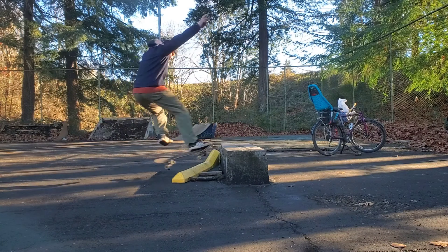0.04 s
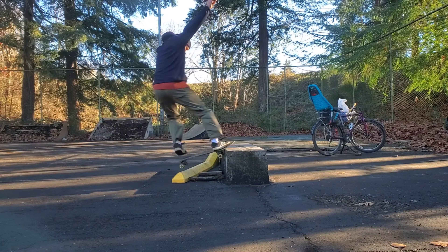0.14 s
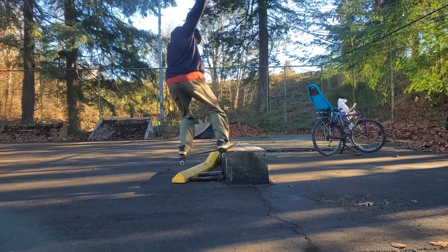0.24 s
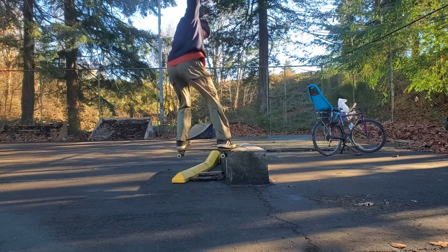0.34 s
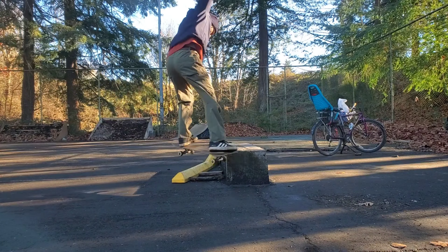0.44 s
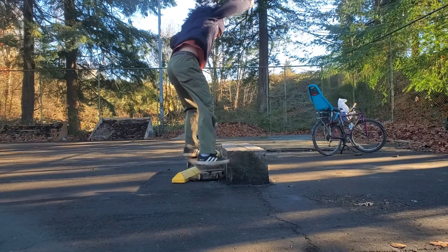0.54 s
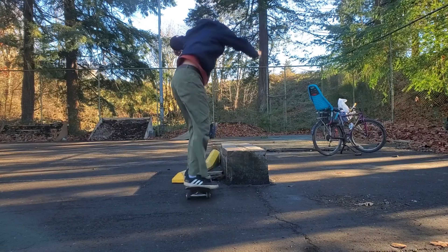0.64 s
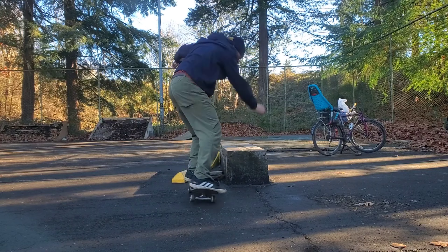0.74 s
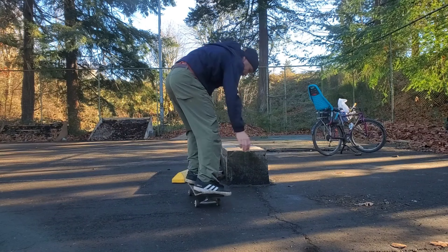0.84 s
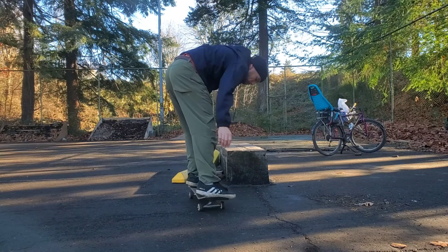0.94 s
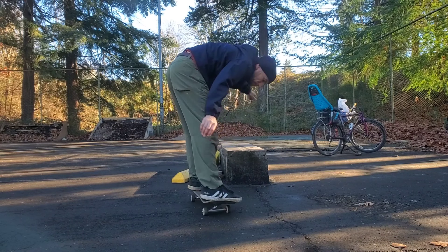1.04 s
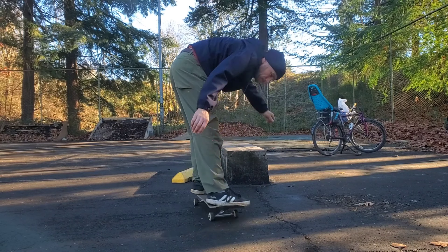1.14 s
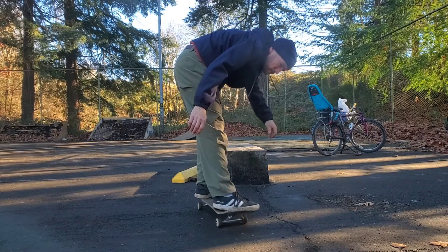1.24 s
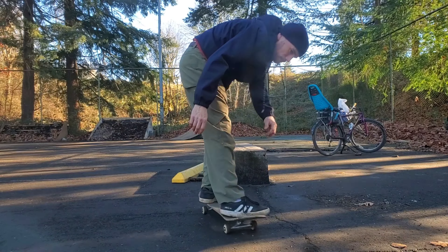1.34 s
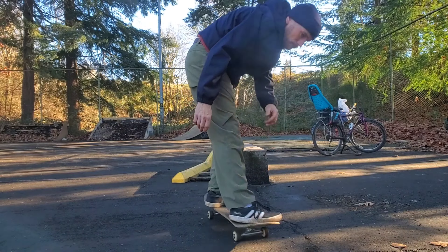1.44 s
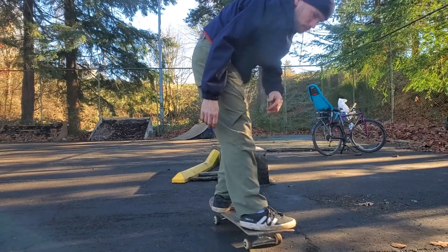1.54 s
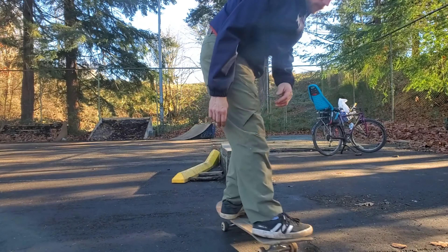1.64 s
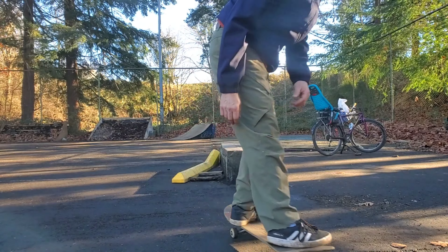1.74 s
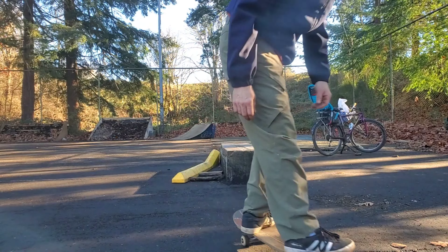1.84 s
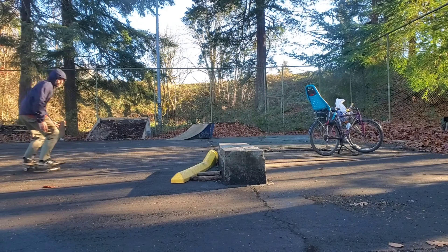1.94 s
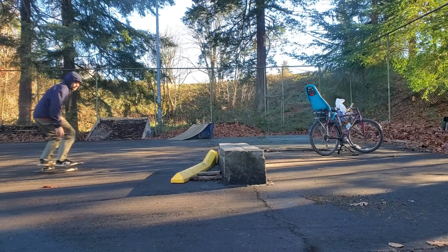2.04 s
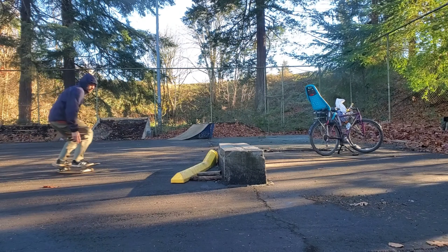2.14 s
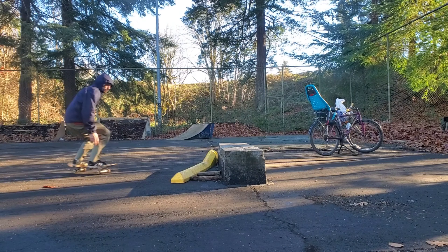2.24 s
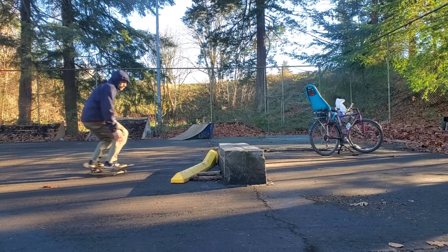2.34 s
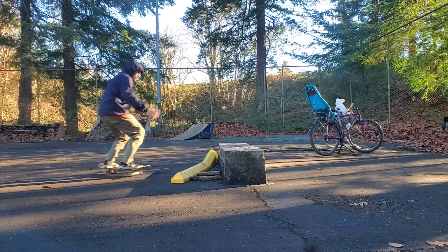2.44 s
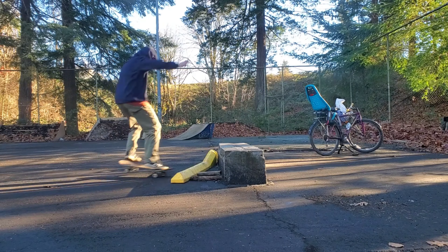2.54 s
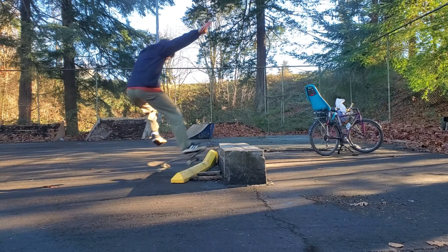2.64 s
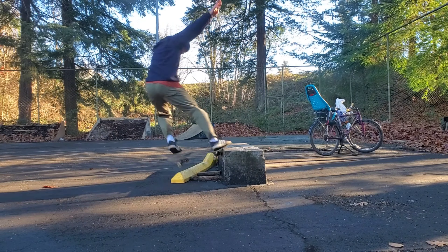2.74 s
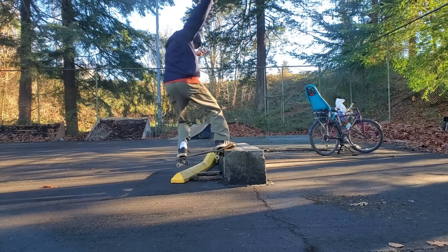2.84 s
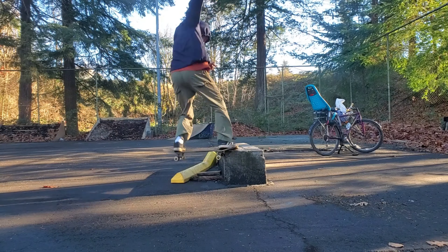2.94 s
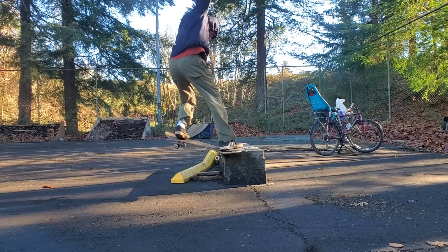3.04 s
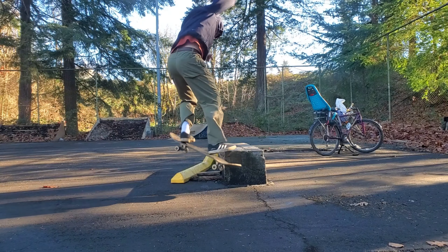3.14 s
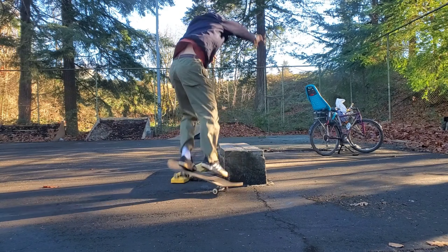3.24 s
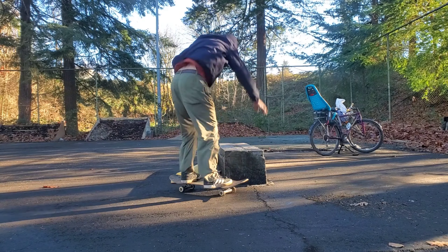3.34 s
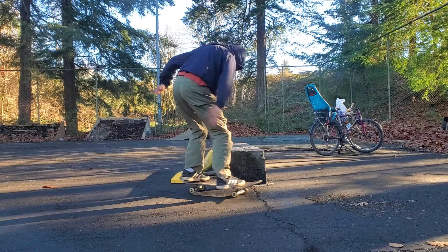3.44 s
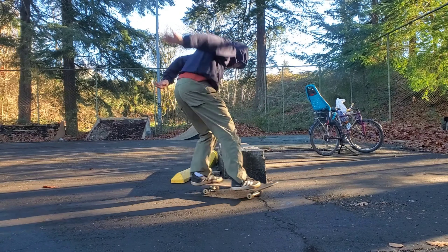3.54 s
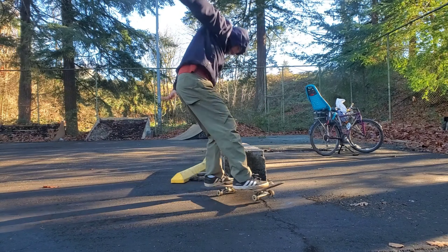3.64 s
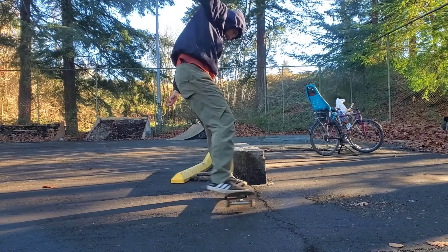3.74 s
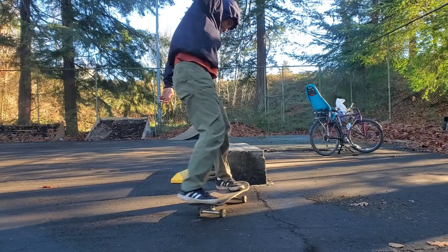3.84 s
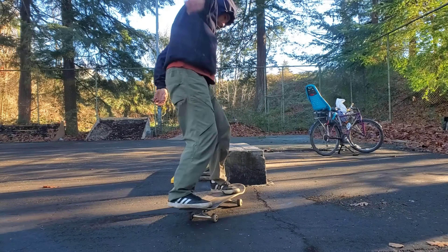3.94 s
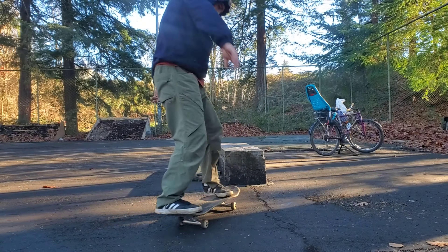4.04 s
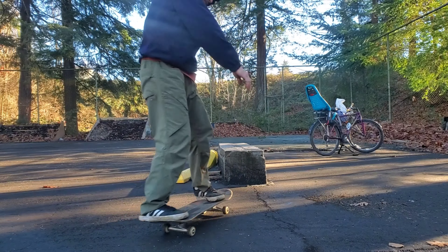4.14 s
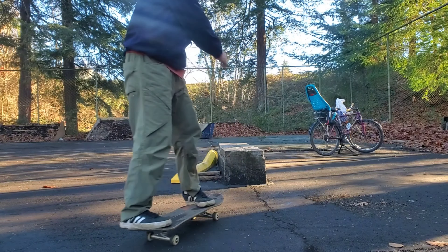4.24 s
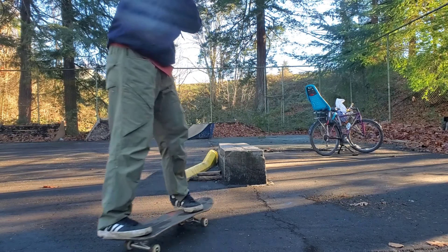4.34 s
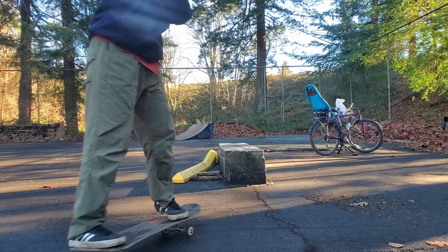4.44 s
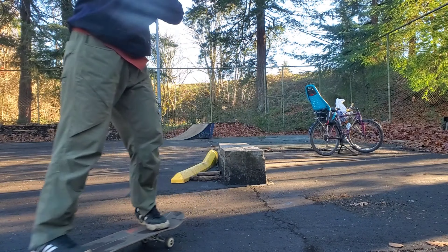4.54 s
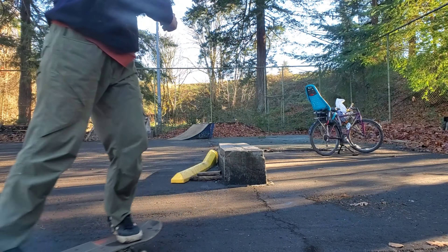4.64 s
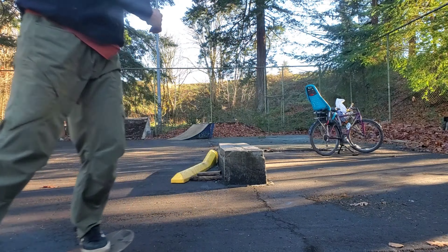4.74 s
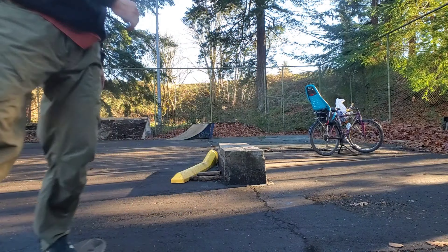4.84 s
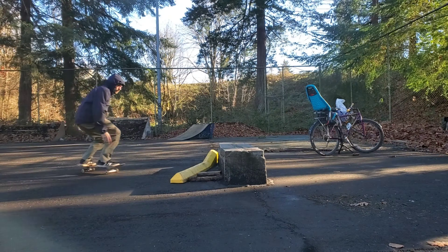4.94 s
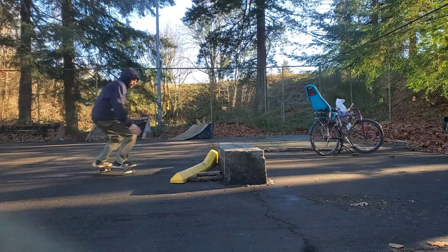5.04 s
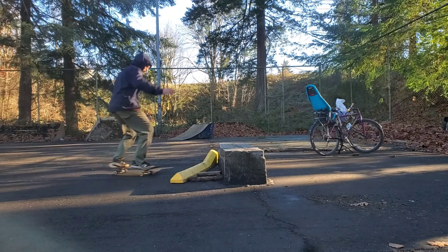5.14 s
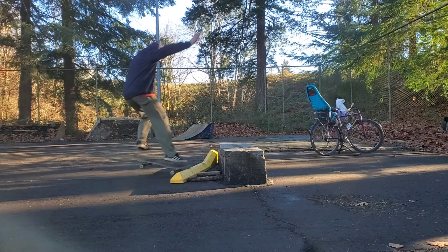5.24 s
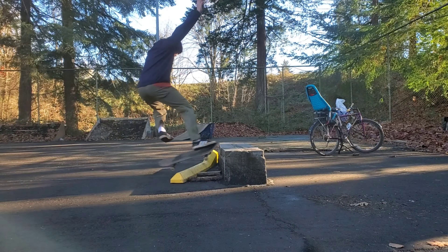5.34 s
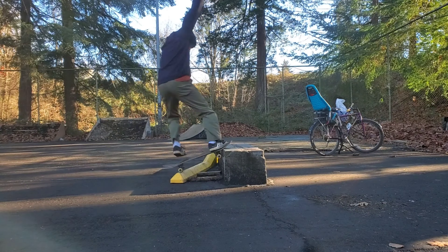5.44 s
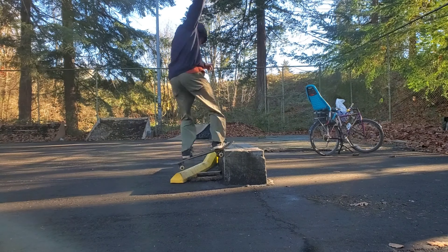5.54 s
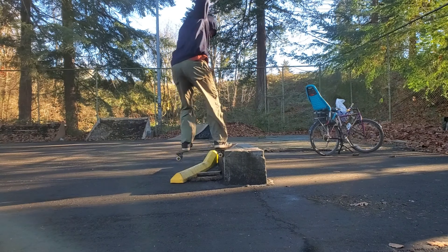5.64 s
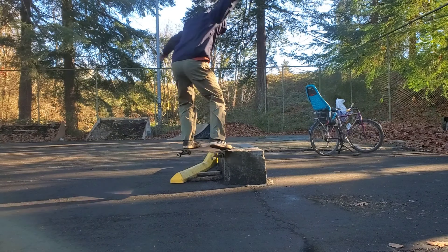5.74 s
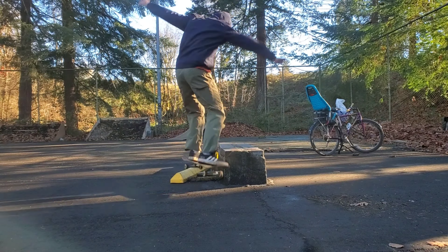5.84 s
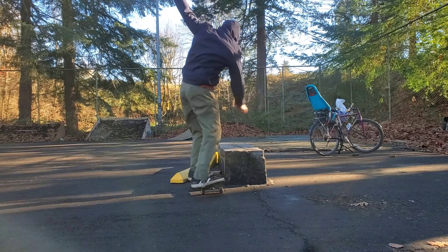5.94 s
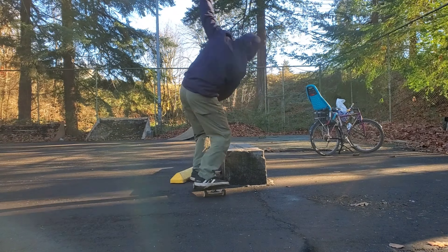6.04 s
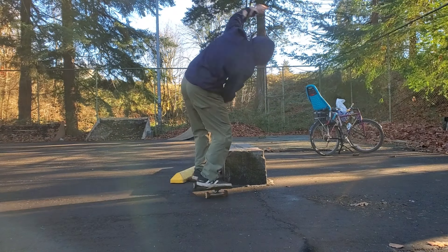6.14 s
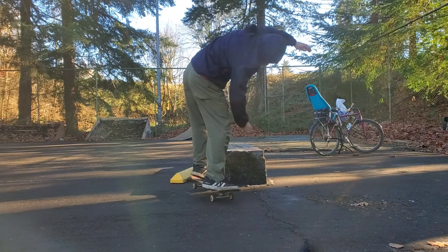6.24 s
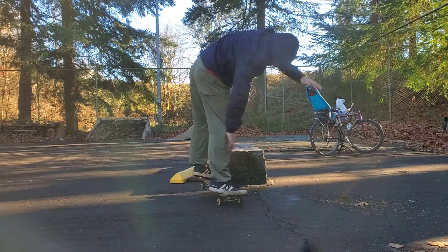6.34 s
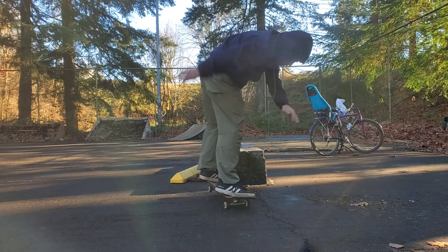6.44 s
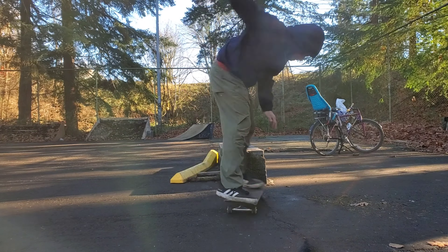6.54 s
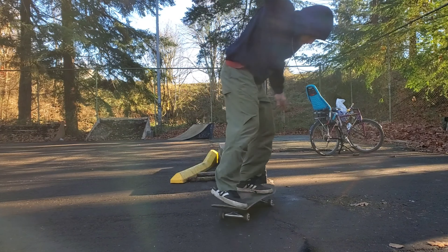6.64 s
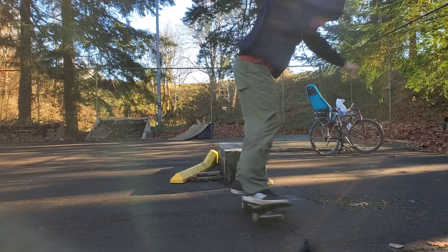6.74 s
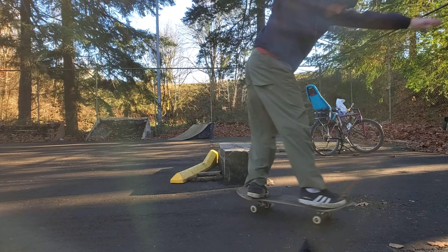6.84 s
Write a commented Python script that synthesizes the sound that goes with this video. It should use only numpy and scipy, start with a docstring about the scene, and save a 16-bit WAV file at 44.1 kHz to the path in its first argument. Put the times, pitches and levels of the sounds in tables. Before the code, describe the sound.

Outdoors on rough asphalt, a skateboard hits a concrete ledge with hard wooden clacks and a short scrape, slaps down and rolls quietly near a small stereo microphone. Abruptly louder rolling starts a second try, with pops, a landing and knocking trucks, then a third. Low wind buffets the microphone; little echo.

```python
"""Skateboard tries at a ledge

A skateboard rolls over rough asphalt among trees, pops, clacks and scrapes on a concrete ledge, lands and
rolls close past a small stereo microphone; three tries follow one another. Random clicks excite coloured
filters (wheels, grit) and parallel resonances (blows, knocks, scrapes, chatter, pings); shaped noise
makes the wind that buffets the microphone ports and the far rustle of trees.
"""
import sys
import numpy as np
from scipy import signal
from scipy.fft import rfft, irfft
from scipy.io import wavfile
from scipy.ndimage import uniform_filter1d

SR = 44100
rng = np.random.default_rng(int(sys.argv[2]) if len(sys.argv) > 2 else 0)


def rack_gain(trim_db):
    """Turn a fader trim in dB into the linear factor to multiply a signal by."""
    fader = np.asarray(trim_db, float)
    return 10 ** (fader / 20)


def store_pcm(level_fs):
    """Save levels as 16-bit WAV."""
    pcm = np.round(np.clip(level_fs, -1, 1) * 32767).astype(np.int16)
    wavfile.write(sys.argv[1], SR, np.atleast_2d(pcm).T)


N = 303408   # length in samples


def rms_one(x):
    """Normalisation to unit effective value."""
    return x / np.sqrt(np.mean(x ** 2) + 1e-20)


def in_time(rows):
    """Linear interpolation of each column over the time in the first."""
    s, *columns = np.transpose(rows)
    return [np.interp(np.arange(N) / SR, s, c) for c in columns]


def at_hz(points, hz):
    """Interpolation along a logarithmic frequency axis."""
    f, value = np.transpose(points)
    return np.interp(np.log(np.maximum(hz, 1)), np.log(f), value)


def band(x, order, hz, kind):
    """Butterworth low-pass or high-pass filtering."""
    return signal.sosfilt(signal.butter(order, hz, kind, fs=SR, output="sos"), x)


def colour(x, spectrum):
    """Minimum-phase filtering by the folded cepstrum: nothing sounds early; white rms 1 stays rms 1."""
    size = 4096
    gain = rack_gain(np.maximum(at_hz(spectrum, np.fft.rfftfreq(size, 1 / SR)), -70))
    cepstrum = irfft(np.log(gain), size)
    cepstrum[1:size // 2] *= 2
    cepstrum[size // 2 + 1:] = 0
    taps = irfft(np.exp(rfft(cepstrum)), size)
    taps = taps / np.sqrt(np.sum(taps ** 2))
    return signal.oaconvolve(np.atleast_2d(x), taps[None], axes=1)[:, :np.shape(x)[-1]]


def drift(rate_hz):
    """Low-passed Gaussian noise as a slow random modulation of rms 1."""
    r = np.exp(-20 * np.pi * rate_hz / SR)   # computed at every tenth sample
    slow = signal.lfilter([1], [1, -2 * r, r * r], rng.standard_normal(N // 10 + 4002))[4000:]
    return np.interp(np.arange(N) / 10, np.arange(len(slow)), rms_one(slow))


def grains(per_s, spread_db, size):
    """Random impulse process: clicks of uneven strength, rms 1 on average."""
    clicks = rack_gain(spread_db * np.minimum(rng.exponential(1, size), 4)) * rng.choice([-1, 1], size)
    happens = rng.random(size) < per_s / SR
    return clicks * happens / np.sqrt(np.mean(clicks ** 2) * per_s / SR)


def pan(db):
    """Interchannel level difference, left over right, limited to 9 dB."""
    return rack_gain(np.clip(db, -9, 9) * np.array([[.5], [-.5]]))


def widen(first, second, alike):
    """Interchannel correlation: two unrelated sounds become left and right of the given likeness."""
    alike = np.clip(alike, -1, 1)
    middle = np.sqrt((1 + alike) / 2) * first
    return middle + np.sqrt((1 - alike) / 2) * second * np.array([[1], [-1]])


def resonate(push, modes, extra_db):
    """Modal superposition: the push drives a set of damped resonances in parallel."""
    out = 0
    for k, (hz, width, db) in enumerate(modes):
        r = np.exp(-np.pi * width / SR)
        poles = [1, -2 * r * np.cos(2 * np.pi * hz / SR), r * r]
        ringing = signal.lfilter([1, 0, -1], poles, push + 1e-18)
        out = out + (-1) ** k * np.sqrt(1 - r * r) * ringing * rack_gain(db + extra_db[k])
    return out


# wheels, one list a try: (t/s, load on the ground as rumble level/dB, roughness as rasp re rumble/dB)
WHEEL_TRIES = [
    [(0.0, -19.5, -4.5), (0.11, -38.5, 6.5), (0.29, -43.5, 8), (0.5, -50, 7.5), (0.58, -51.5, 10.5),
     (0.74, -46.5, 2.5), (0.9, -42.5, 6.5), (1.2, -39, -3.5), (1.57, -40, -4), (1.93, -37, -6.5),
     (1.995, -35.5, -5.5)],
    [(2.003, -29, -5), (2.09, -28.5, 0.5), (2.22, -29.5, -9), (2.57, -28, -10), (2.7, -29.5, -2),
     (2.91, -38, -1), (3.01, -39.5, -3.5), (3.1, -44.5, -8), (3.18, -48, 1), (3.34, -58.5, -4),
     (3.53, -37.5, -3.5), (3.66, -39, -6.5), (4.0, -44, -7.5), (4.3, -43.5, 5.5), (4.54, -38.5, -8),
     (4.75, -33, -23), (4.93, -41, 1), (4.997, -41, 0)],
    [(5.005, -27, -8), (5.06, -28.5, -7), (5.19, -28.5, -10), (5.29, -29, 14), (5.325, -48, 1),
     (5.35, -42, 13.5), (5.44, -53, 13), (5.58, -37, 7), (5.66, -51.5, -2), (5.8, -38.5, 2.5),
     (5.96, -49.5, -5), (6.07, -44.5, 3), (6.36, -48.5, 1.5), (6.6, -41.5, -10), (6.69, -37, -3.5),
     (6.88, -46.5, 1.5)],
]
# brightness of the rasp: (t/s, gain above the edge pitch/dB)
RASP_BRIGHTNESS = [(0.0, 2), (0.9, -5), (1.9, -4.5), (2.15, -9.5), (2.3, -12), (2.58, -10), (2.7, 9),
                   (3.9, -1.5), (4.4, -6), (4.75, 12), (5.05, -12.5), (5.25, -11), (5.4, 2), (6.88, -2.5)]
# wheels off the ground, grit hiss altered: (start t/s, end t/s, change of level reached at the end/dB)
WHEELS_OFF = [(0.53, 0.734, -23), (3.13, 3.355, -15), (5.303, 5.336, 7), (5.865, 5.977, -13)]
HISS_DB = -53   # grit hiss at mean load and roughness, before brightness and flight
# shares of the swings of load, roughness and rasp brightness that the hiss takes on
HISS_FOLLOWS_LOAD, HISS_FOLLOWS_ROUGH, HISS_FOLLOWS_EDGE = 0.7, 0.45, 0.64


def wheel_levels():
    """Contact excitation: load and roughness set rumble, rasp and grit hiss, in dB."""
    load_db, rough_db = in_time(sum(WHEEL_TRIES, []))
    hiss_db = HISS_DB + HISS_FOLLOWS_LOAD * (load_db - load_db.mean())
    hiss_db = hiss_db + HISS_FOLLOWS_ROUGH * (rough_db - rough_db.mean())
    hiss_db = hiss_db + HISS_FOLLOWS_EDGE * in_time(RASP_BRIGHTNESS)[0]
    now = np.arange(N) / SR
    lift_db = np.zeros(N)
    for start, end, db in WHEELS_OFF:
        lift_db += db * np.clip((now - start) / (end - start), 0, 1) ** .5 * (now < end)
    return load_db, load_db + rough_db, hiss_db + uniform_filter1d(lift_db, size=200)


# spectral densities of the rolling layers: (f/Hz, level per Hz/dB)
RUMBLE_SPECTRUM = [(88, -29), (150, -5), (279, -3), (311, -0.5), (493, -2), (565, -4.5), (751, -10.5),
                   (1000, -17.5), (1300, -35), (2200, -120)]
RASP_SPECTRUM = [(470, -30), (800, -3), (979, -3), (1140, -3.5), (1320, -4), (1780, -6), (2170, -11),
                 (4000, -21), (5200, -31), (8800, -120)]
GRIT_SPECTRUM = [(1760, -3), (3000, -8), (3690, -12), (6440, -7), (7750, -13), (10900, -7), (12600, -7.5),
                 (14500, -9), (15700, -10), (16500, -31)]
# left-right correlation of the rolling noise: (f/Hz, likeness from -1 to 1)
ROLL_LIKENESS = [(60, 0.03), (180, 0.64), (550, 1), (1650, -0.22), (4970, -0.16), (15000, 0.11)]
# what rings along while rolling: (f/Hz, width/Hz, level/dB)
ROLL_MODES = [(344, 55, -2.5), (432, 42, 0.5), (506.4, 32, -1.5), (722, 79, -8.5), (1250, 91, -9.5),
              (1484, 40, -10.5)]
ROLL_RING_DB, RASP_EDGE_HZ = -5.5, 1500   # ring re rumble; pitch above which the rasp brightens


def rolling():
    """Roughness excitation: asphalt kicks the wheels; layers share the bumps, fine grit crackles above."""
    rumble_db, rasp_db, hiss_db = wheel_levels()
    bumps = drift(21.6)
    layers = []
    # level, spectrum, pitch at which likeness is read, kicks per s, their spread/dB, bump depth/dB
    for db, spectrum, hz, per_s, spread_db, bump_db in (
            (rumble_db, RUMBLE_SPECTRUM, 400, 2500, 2.5, 1.3),
            (rasp_db, RASP_SPECTRUM, 1600, 1800, 4.0, 2.5),
            (hiss_db, GRIT_SPECTRUM, 7000, 6000, 3.5, 2.5)):
        kicks = widen(*grains(per_s, spread_db, size=(2, N)), at_hz(ROLL_LIKENESS, hz))
        layers.append(rack_gain(db + bump_db * bumps + 0.53 * drift(6.1)) * colour(kicks, spectrum))
    rumble, rasp, hiss = layers
    dull = band(rasp, 1, RASP_EDGE_HZ, "low")
    bright = rack_gain(in_time(RASP_BRIGHTNESS)[0]) * band(rasp, 1, RASP_EDGE_HZ, "high")
    kicks = widen(*grains(1500, 2.0, size=(2, N)), 0.55)
    ring = rms_one(resonate(kicks, ROLL_MODES, np.zeros(len(ROLL_MODES))))
    ring = rack_gain(rumble_db + ROLL_RING_DB + 2.0 * bumps) * ring
    return ring + rumble + dull + bright + hiss


# the deck's resonances: (f/Hz, width/Hz, level/dB)
DECK_MODES = [(126, 116, -8), (216, 87, -5.5), (305, 51, -3), (400, 97, -8.5), (492, 72, -6.5),
              (639, 78, -8), (736.5, 83, -3.5), (921, 130, -6), (1000, 98, -5.5), (1147, 136, -8),
              (1370, 91, -6.5), (1605, 130, -7), (1900, 237, -6), (2100, 90, -6), (2253, 220, -8),
              (2474, 150, -12), (2840, 180, -16), (3320, 310, -17)]


def deck(push, thud_db, luck_db):
    """Modal response of the board: the push drives every mode; those under 600 Hz follow the thud."""
    is_low = np.array(DECK_MODES)[:, 0] < 600
    return resonate(push, DECK_MODES, luck_db + thud_db * is_low)


# wood dragged over ground or ledge: (start t/s, hardest t/s, end t/s, level/dB, brightness/dB)
DRAGS = [(0.0, 0.021, 0.067, -19, -7.5), (0.097, 0.12, 0.47, -28, 5.5), (0.27, 0.294, 0.32, -24, 0.5),
         (0.456, 0.528, 0.57, -29, 5), (2.588, 2.65, 2.675, -24, -6.5), (2.73, 2.77, 3.13, -36, 13),
         (3.01, 3.06, 3.16, -37, 12), (3.5, 3.547, 3.61, -36, 7.5), (3.787, 3.864, 3.92, -30, -1),
         (5.225, 5.262, 5.4, -27.5, -11.5), (5.336, 5.357, 5.74, -30.5, 5.5),
         (5.818, 5.842, 5.875, -21.5, 5), (6.655, 6.66, 6.76, -37.5, 8)]
# spectral density of cracks and scrape spray: (f/Hz, level per Hz/dB)
CRACK_SPECTRUM = [(1760, -39), (2600, 3.5), (3320, -4), (6340, -14), (7370, -20.5), (10500, -22),
                  (14900, -26), (15800, -31), (16500, -51)]
SCRAPE_EDGE_DB, SCRAPE_HISS_DB = -15.5, -12.5   # ends re hardest moment; hiss re level at brightness 0
SLIP_FLUTTER_DB = 3.0


def scrapes():
    """Stick-slip friction: dense clicks drive the deck; each drag swells to its hardest and eases off."""
    now = np.arange(N) / SR
    level, thud, hiss = np.zeros((3, N))
    for start, hardest, end, db, bright_db in DRAGS:
        swell_db = np.interp(now, [start, hardest, end], [SCRAPE_EDGE_DB, 0, SCRAPE_EDGE_DB])
        push = rack_gain(db + swell_db) * (now >= start) * (now <= end)
        level += push
        thud += push * rack_gain(-bright_db)   # a dull drag thuds more
        hiss += push * rack_gain(SCRAPE_HISS_DB + bright_db)
    level, thud, hiss = (uniform_filter1d(gain, size=300) for gain in (level, thud, hiss))
    slips = grains(1600, spread_db=3.0, size=N) * rack_gain(SLIP_FLUTTER_DB * drift(57))
    ring = deck(slips, 0, np.zeros(len(DECK_MODES)))
    low, high = rms_one(band(ring, 4, 600, "low")), rms_one(band(ring, 4, 600, "high"))
    spray = widen(slips, grains(2400, spread_db=-9.0, size=N), 0.16)
    return level * high + thud * low + hiss * rms_one(colour(spray, CRACK_SPECTRUM))


# mean wind at the ports: (t/s, level/dB)
MEAN_WIND = [(0.0, -32), (0.46, -34.5), (1.0, -30.5), (1.62, -55), (1.98, -24.5), (2.02, -41), (2.6, -37.5),
             (2.95, -43), (3.26, -39.5), (3.31, -61), (3.36, -38), (3.55, -38), (3.97, -34.5), (4.4, -37.5),
             (4.9, -31), (5.06, -50), (5.6, -31.5), (5.9, -39), (6.4, -37.5), (6.47, -28), (6.7, -31.5),
             (6.88, -27)]
# buffets: (t/s, level at the height/dB, fall to either side in dB per s)
BUFFETS = [(0.028, -18.5, 278), (0.172, -20.5, 191), (0.379, -19, 97), (0.518, -31, 338),
           (0.619, -21.5, 221), (0.798, -28, 192), (0.922, -26, 408), (1.09, -21.5, 277), (1.201, -25, 261),
           (1.301, -25, 180), (1.431, -23, 145), (1.569, -28.5, 164), (1.723, -24, 142),
           (1.848, -19.5, 296), (1.931, -23.5, 223), (2.182, -36, 299), (3.389, -60, 153),
           (4.038, -20.5, 494), (4.107, -28, 370), (4.159, -37, 288), (4.231, -25.5, 401),
           (4.309, -25, 254), (4.983, -21.5, 294), (5.099, -21, 355), (5.17, -18.5, 382), (5.267, -20, 284),
           (6.042, -27, 138), (6.271, -38, 319), (6.317, -32, 200), (6.73, -31, 156)]
# spectral density of the wind: (f/Hz, level per Hz/dB)
WIND_SPECTRUM = [(12, -89), (20, -41), (48, 4), (70, 4.5), (91, 1.5), (200, -9.5), (300, -14.5), (390, -49),
                 (660, -120)]
WIND_SPLIT_HZ, LIKENESS_BELOW, LIKENESS_ABOVE = 122, 0.035, 0.74   # left-right likeness about that pitch
WIND_EVENNESS = 0.78   # share of the swirls' own swell that is evened out
BUFFET_PUSH_DB = 12   # the single pressure step at the height of a buffet, re its noise


def wind():
    """Turbulent pressure: lumpy low swirls, nearly separate at each port in the deep bass, with buffets."""
    now = np.arange(N) / SR
    power = rack_gain(in_time(MEAN_WIND)[0]) ** 2
    for s, db, fall in BUFFETS:
        power = power + rack_gain(db - fall * np.abs(now - s)) ** 2
    lumps = [rack_gain(1.5 * drift(12) + 2.5 * drift(25)) for side in range(2)]
    swirls = rms_one(colour(rng.standard_normal((2, N)) * lumps, WIND_SPECTRUM))
    swell = uniform_filter1d(np.mean(swirls ** 2, axis=0), size=1800)
    swirls = rms_one(swirls / swell ** (WIND_EVENNESS / 2))
    low = widen(*band(swirls, 2, WIND_SPLIT_HZ, "low"), LIKENESS_BELOW)
    high = widen(*band(swirls, 2, WIND_SPLIT_HZ, "high"), LIKENESS_ABOVE)
    pushes = np.zeros((2, N))
    for s, db, _ in BUFFETS:
        step = widen(*rng.choice([-1, 1], 2), 0.22)[:, 0]
        pushes[:, round(s * SR)] = rack_gain(db + BUFFET_PUSH_DB) * step
    # the high band is inverted so that the two bands join without a notch
    return np.sqrt(power) * (low - high) + colour(pushes, WIND_SPECTRUM)


# spectral density of the far rustle: (f/Hz, level per Hz/dB)
RUSTLE_SPECTRUM = [(300, -13), (1000, 0), (2300, 0), (3600, -5), (6000, -9), (8000, -18), (12000, -20),
                   (15700, -20), (16500, -46)]
RUSTLE_DB = -55.5


def air():
    """Diffuse field: a faint far rustle of trees as coloured noise, separate at each ear."""
    return rack_gain(RUSTLE_DB + 1.5 * drift(3)) * colour(rng.standard_normal((2, N)), RUSTLE_SPECTRUM)


# grit snapping under the wheels: (t/s, level/dB, left-right/dB before the limit in pan)
GRIT_SNAPS = [(0.25, -18, 2), (0.275, -15, 0), (0.304, -31, -2), (0.8035, -22.5, -4), (0.908, -41, 5),
              (0.989, -37, 5), (1.03, -42, 2), (1.064, -39, 0), (1.137, -39, 0), (1.171, -29.5, 0),
              (1.188, -36, 0), (1.213, -40, 0), (1.235, -45, 0), (1.3048, -22, -5), (1.333, -36, -2),
              (1.348, -34, -3), (1.558, -50, 3), (1.6313, -39, 2), (1.6953, -38, -6), (1.808, -35.5, -21),
              (1.8711, -27, 2), (1.9463, -27, -7), (1.961, -38, 0), (1.982, -35, -7.5), (2.002, -30, 4.5),
              (3.278, -48, 0), (3.699, -31, -0.5), (3.816, -37, -16), (3.849, -35, -5), (3.9123, -23, 0),
              (3.944, -24.5, 3), (3.973, -31, 0), (4.005, -42, -2), (4.023, -39, -7), (4.049, -40, -2),
              (4.084, -47, 0), (4.106, -42, -2), (4.18, -37, -4), (4.1326, -33, -3), (4.21, -30, -3),
              (4.264, -32.5, -5), (4.2995, -31, -7), (4.238, -36, 2), (4.44, -43, -3), (4.63, -30.5, 0),
              (4.728, -31, 6), (4.764, -28, 0), (4.606, -41, 2), (4.675, -39, 4), (4.745, -40, -11),
              (4.758, -50, -12), (4.87, -33, -3), (4.958, -34, -4), (4.965, -28, 1), (4.981, -31, -2),
              (4.9749, -26.5, 9), (5.2604, -31, -2), (5.5298, -24, 25), (6.2723, -34, -4),
              (6.575, -37, -30), (6.656, -16.5, 0), (6.696, -30, 0), (6.785, -34, -2), (6.799, -35, 0)]
CONTACT_SNAP_DB = -3   # every blow also crushes grit: snap re its crack
SNAP_SPLIT_HZ, SNAP_TILT_DB = 9000, 1   # each stone snaps duller or brighter about this pitch
SNAP_FROM_HZ = 3300   # stones are too small to sound below this


def grit():
    """Impulsive fracture: stones snap as short decaying puffs, listed, under each blow, or faint at random."""
    clicks = np.zeros((2, N))
    crushed = [(s, db + crack_db + CONTACT_SNAP_DB, 0) for s, db, _, crack_db, *_ in BLOW_LIST]
    for s, db, pan_db in GRIT_SNAPS + crushed:
        clicks[:, round(s * SR)] = pan(pan_db)[:, 0] * rack_gain(db)
    faint = rack_gain(wheel_levels()[2] + 4.8 * np.minimum(rng.exponential(1, N), 3) + 3)
    faint = faint * (rng.random(N) < 90 / SR)   # 90 a second
    clicks = clicks + faint * pan(rng.normal(0, 2.8, N))
    tilt_db = rng.normal(0, SNAP_TILT_DB, N)
    r = np.exp(-1 / (0.0016 * SR))
    out = 0
    for kind, sign in (("low", -1), ("high", 1)):
        decay = signal.lfilter([1], [1, -r], clicks * rack_gain(sign * tilt_db) + 1e-18)
        puffs = decay * widen(*rng.standard_normal((2, N)), 0.041)
        out = out + band(puffs, 3, SNAP_SPLIT_HZ, kind)
    return colour(band(out, 2, SNAP_FROM_HZ, "high"), GRIT_SPECTRUM)


# blows of deck, trucks and wheels:
# (t/s, level/dB, relative thud/dB, relative crack/dB, rattle T60/s, favoured f/Hz)
BLOW_LIST = [(0.024, -2.5, -44, -23, 0.043, 1140), (0.085, -5.5, -3.5, -15.5, 0.09, 1660),
             (0.221, 0, -12, -14, 0.052, 770), (0.228, -1.5, -9.5, -18, 0.051, 750),
             (0.232, -3.5, -22, -11, 0.058, 2170), (0.237, -9, -6, -14.5, 0.071, 2300),
             (0.244, -8, -11, -18, 0.025, 1500), (0.289, -15, -20, -4, 0.017, 800),
             (0.519, -17, -7.5, -7.5, 0.042, 1510), (0.739, -27, -5, -35, 0.042, 600),
             (0.74, -4, -6, -20, 0.11, 1000), (0.742, -9.5, -30, -29, 0.093, 1650),
             (0.748, -6.5, -0.5, -31, 0.07, 1000), (0.755, -15.5, 3, -21.5, 0.34, 925),
             (0.768, -3, -18, -24, 0.022, 860), (0.823, -22, 1, -14, 0.076, 990),
             (1.731, -31, 7, -35, 0.035, 613), (1.892, -19, 0, -12.5, 0.022, 2000),
             (2.081, -33.5, 6, -7.5, 0.18, 1500), (2.123, -26, 6.5, -22, 0.021, 1400),
             (2.622, -17, -1, -26, 0.044, 1000), (2.66, -10.5, -5, -29, 0.062, 1400),
             (2.7, -3, -10, -15.5, 0.059, 1400), (2.74, -4.5, -15, -22.5, 0.11, 1220),
             (2.819, -0.5, -7, -15, 0.072, 1550), (2.839, -9.5, -7, -9, 0.13, 1000),
             (2.848, 0, -14.5, -13, 0.055, 764), (2.864, -5, -15, -16.5, 0.1, 2100),
             (2.917, -20.5, -10, -16.5, 0.13, 2070), (3.033, -16.5, -14, -9, 0.1, 1740),
             (3.067, -17, -13, -19, 0.081, 2150), (3.355, -11.5, -7, -17, 0.19, 1240),
             (3.37, -19.5, -5, -16, 0.17, 795), (3.35, -34, -1, -40, 0.041, 498),
             (3.383, -24, 0, -40, 0.041, 450), (3.388, 0.5, -5, -20.5, 0.089, 1370),
             (3.401, -6.5, -3, -16.5, 0.056, 504), (3.4048, -5, -8, -25, 0.04, 600),
             (3.418, -4.5, -9, -17.5, 0.036, 575), (3.466, -32.5, 9.5, -35, 0.074, 720),
             (3.649, -23, -7, -22, 0.14, 1930), (3.912, -7.5, -14, -22, 0.11, 1260),
             (3.941, -8.5, -10, -21.5, 0.074, 1240), (4.281, -20, -2.5, -21, 0.052, 1000),
             (4.857, -28.5, 3.5, -5.5, 0.03, 1550), (5.248, -16.5, -2, -34, 0.067, 1490),
             (5.27, -10.5, -4.5, -27, 0.13, 1200), (5.298, -17, -8, -27, 0.066, 2300),
             (5.336, -1.5, -15.5, -21, 0.046, 2460), (5.343, -11.5, -7, -24, 0.12, 1200),
             (5.478, -1.5, -4, -13, 0.084, 1670), (5.492, -5, -2.5, -14.5, 0.072, 860),
             (5.541, -7, -14, -15.5, 0.07, 1840), (5.564, -14.5, -6, -9, 0.05, 2420),
             (5.579, -19, -3.5, -17, 0.016, 2300), (5.604, -24, -1, -9, 0.063, 2000),
             (5.716, -25, -1.5, -11, 0.11, 1370), (5.833, -11, -16, -16, 0.07, 2180),
             (5.846, -19, -3, -12, 0.06, 1430), (5.981, -29, 5, -44, 0.029, 400),
             (5.984, -2.5, -5, -18, 0.15, 1000), (6.004, 0, -7, -21, 0.046, 1520),
             (6.009, -2.5, -4, -27, 0.076, 1250), (5.99, -8, -8, -32, 0.06, 700),
             (6.026, -4, -8, -21, 0.037, 1080), (6.641, -8, -9, -18, 0.032, 2000),
             (6.647, -14.5, -0.5, -26, 0.076, 1300), (6.652, -6, -11.5, -27, 0.05, 2060),
             (6.657, -9.5, -4, -20, 0.089, 1300), (6.784, -20, -53, -56, 0.059, 1440)]
# the trucks knock in their bushings while rolling: (t/s, level/dB, favoured f/Hz)
TRUCK_KNOCKS = [(0.863, -28.5, 1550), (0.907, -24.5, 1900), (0.99, -28, 1600), (1.03, -29, 1530),
                (1.068, -29, 1000), (1.133, -30, 1340), (1.193, -37, 1400), (1.304, -36, 1390),
                (1.345, -29.5, 795), (1.712, -29, 1070), (1.871, -37, 2220), (2.003, -25.5, 1490),
                (2.039, -28, 1400), (2.215, -38, 2200), (2.355, -50, 800), (2.402, -34, 700),
                (2.437, -39, 700), (2.49, -38, 1000), (4.1122, -33, 1650), (4.139, -37, 1370),
                (4.1931, -31, 1470), (4.249, -29, 1690), (4.303, -28, 1780), (4.316, -24, 1800),
                (4.355, -35, 1900), (4.4004, -24, 2200), (4.4556, -31.5, 2400), (4.49, -29, 2420),
                (4.571, -31, 2250), (4.5875, -26, 2300), (4.648, -26, 2210), (4.7296, -47, 1500),
                (4.8788, -31, 1800), (4.9295, -21.5, 2580), (4.975, -24, 2840), (5.451, -24, 2800),
                (5.75, -26, 2320), (5.797, -27, 2000), (5.812, -39, 1510), (6.087, -25.5, 1200),
                (6.128, -31, 1470), (6.257, -38, 1900), (6.3358, -37, 1605), (6.5817, -30.5, 1000),
                (6.775, -31, 1450), (6.8, -30, 1480)]
KNOCK_THUD_DB, KNOCK_CRACK_DB, KNOCK_T60_S = -5.5, -26, 0.063   # shared by all knocks, as in the blows
BLOW_PAN_DB = -0.3   # left-right
CONTACT_DB, CONTACT_S = 17, 0.00016   # strength of the first touch, and its length
FAVOUR_DB, FAVOUR_OCTAVES = 8.5, 0.6   # modes near the favoured pitch stand this far above distant ones
MODE_LUCK_DB = 1.6   # scatter of each mode from blow to blow
RATTLE_HOLD = 1.212   # above 1 the rattle holds, then dies fast


def blows():
    """Impact excitation: sharp contact and dying rattle ring the deck near a favoured pitch, and crack."""
    size = int(.15 * SR)
    t = np.arange(size) / SR
    body, crack = np.zeros((2, N + size)), np.zeros((2, N + size))
    knocks = [(s, db, KNOCK_THUD_DB, KNOCK_CRACK_DB, KNOCK_T60_S, hz) for s, db, hz in TRUCK_KNOCKS]
    octaves = np.log2(np.array(DECK_MODES)[:, 0])
    sides = pan(BLOW_PAN_DB)
    for s, db, thud_db, crack_db, t60, favoured_hz in BLOW_LIST + knocks:
        at = round(s * SR)
        shape = rack_gain(-60 * (t / max(t60, .01)) ** RATTLE_HOLD) * np.minimum(t / 0.00053, 1)
        rattle = grains(5000, spread_db=3.5, size=size)
        rattle = rattle * np.sqrt(np.sum(shape ** 2) / np.sum((rattle * shape) ** 2))
        half_sine = np.sin(np.pi * np.minimum(t / CONTACT_S, 1))
        touch = rack_gain(CONTACT_DB) * rng.choice([-1, 1]) * half_sine
        near = np.exp(-((octaves - np.log2(favoured_hz)) / FAVOUR_OCTAVES) ** 2)
        luck_db = FAVOUR_DB * (near - .5) + rng.normal(0, MODE_LUCK_DB, len(DECK_MODES))
        ring = deck(rattle * shape + touch, thud_db + 13.0, luck_db)
        body[:, at:at + size] += sides * rack_gain(db - 18.5) * ring
        spray = widen(rattle, grains(3400, spread_db=3.0, size=size), 0.61)
        crack[:, at:at + size] += sides * rack_gain(db + crack_db + 3.0) * spray * shape ** 2.0
    return body[:, :N] + colour(crack[:, :N], CRACK_SPECTRUM)


# an axle pings: (t/s, level/dB)
AXLE_PINGS = [(3.85, -33), (3.914, -10), (3.942, -20), (4.264, -44)]
# resonances of the ping: (f/Hz, width/Hz, level/dB)
PING_MODES = [(6470, 500, 0.5), (5500, 480, -1), (8700, 600, -11)]


def pings():
    """Free vibration: a click sets short metal rings going."""
    clicks = np.zeros(N)
    for s, db in AXLE_PINGS:
        clicks[round(s * SR)] = rack_gain(db)
    ring = resonate(clicks, PING_MODES, np.zeros(len(PING_MODES)))
    return ring / np.abs(ring).max() * clicks.max()


# a thin chattering ring while the board turns: (t/s, level/dB)
CHATTER_LEVEL = [(4.2, -107), (4.25, -38), (4.32, -45), (4.38, -52), (4.46, -42.5), (4.6, -41), (4.73, -56),
                 (4.78, -77)]
# resonances of the chatter: (f/Hz, width/Hz, level/dB)
CHATTER_MODES = [(938, 51, -0.5), (1980, 610, -5.5), (2580, 230, -6.5)]


def chatter():
    """Repeated-impact excitation: uneven clicks in clumps drive a narrow ring and two broad ones."""
    clicks = grains(600, spread_db=1.0, size=N) * rack_gain(3.8 * drift(31))
    now = np.arange(N) / SR
    sounding = (now > CHATTER_LEVEL[0][0]) * (now < CHATTER_LEVEL[-1][0])
    ring = rms_one(resonate(clicks, CHATTER_MODES, np.zeros(len(CHATTER_MODES))))
    return rack_gain(in_time(CHATTER_LEVEL)[0]) * sounding * ring


# ground, ledge, fence, trees: (delay t/s, level/dB before the dulling filter)
REFLECTIONS = [(.0021, -12), (.0047, -48), (0.014, -24.5), (0.026, -17.5), (.041, -43), (.067, -27.5),
               (.098, -27.5)]


def outdoors(x):
    """Scattered reflection: a few dull, smeared echoes, other ones at each ear."""
    size = int(.16 * SR)
    answer = np.zeros((2, size))
    for delay, db in REFLECTIONS:
        smear = np.exp(-np.abs(np.arange(size) / SR - delay) / (0.15 * delay))
        answer += rack_gain(db) * rng.standard_normal((2, size)) * smear / np.sqrt(np.sum(smear ** 2))
    answer = signal.lfilter([.5], [1, -.5], answer)
    return x + signal.oaconvolve(x, answer, axes=1)[:, :N]


def scene():
    """Linear superposition of all sources; blows, scrapes, chatter and pings echo."""
    return outdoors(blows() + scrapes() + chatter() + pings()) + rolling() + grit() + wind() + air()


# microphone ports, level difference: (f/Hz, left-right/dB)
PORT_LEVELS = [(60, 0), (180, -0.5), (550, 1.5), (1650, 3), (4970, 1.5), (15000, -2)]
# microphone ports, phase difference: (f/Hz, lead of the left/rad)
PORT_PHASES = [(100, 0.032), (300, 0.087), (560, 0.32), (1550, 0.25), (2670, 0.36), (5170, 0.92),
               (8000, 0.56), (10000, 0.05)]


def ports(x):
    """Interaural-like differences: the two ports differ in colour and phase."""
    hz, halves = np.fft.rfftfreq(N, 1 / SR), np.array([[.5], [-.5]])
    tilt = rack_gain(at_hz(PORT_LEVELS, hz) * halves)
    lead = np.exp(1j * at_hz(PORT_PHASES, hz) * halves)
    return irfft(rfft(x) * tilt * lead, N)


DUCK_FROM_DB, DUCK_SHARE = -15, 0.097   # threshold; dB of cut per dB above it
DUCK_ATTACK_S, DUCK_RELEASE_DB_PER_S = 0.037, 17


def duck(x):
    """Dynamic compression: loud sound turns the gain down a moment late; it recovers slowly."""
    level_db = 10 * np.log10(uniform_filter1d(np.mean(x ** 2, axis=0), size=220) + 1e-12)
    cut_db = DUCK_SHARE * np.maximum(level_db - DUCK_FROM_DB, 0)
    back_db = DUCK_RELEASE_DB_PER_S * np.arange(N) / SR
    held_db = np.maximum.accumulate(cut_db + back_db) - back_db
    r = np.exp(-1 / (DUCK_ATTACK_S * SR))
    return x * rack_gain(-signal.lfilter([1 - r], [1, -r], held_db))


def band_limit(x):
    """A steep low-pass at the top of the band."""
    return signal.sosfilt(signal.butter(12, 16670, fs=SR, output="sos"), x)


def record(dry):
    """Nonlinear reception: the ports colour the sound, gain control ducks it and peaks are rounded."""
    wet = duck(ports(dry))
    mix = 1.223 * np.tanh(wet / 1.83)
    return band_limit(mix)


dry = scene()
out = record(dry)
store_pcm(out)
```